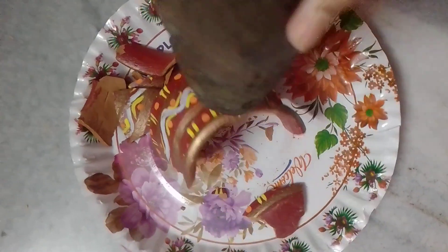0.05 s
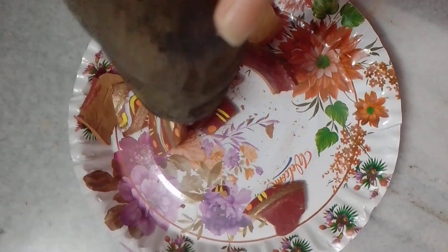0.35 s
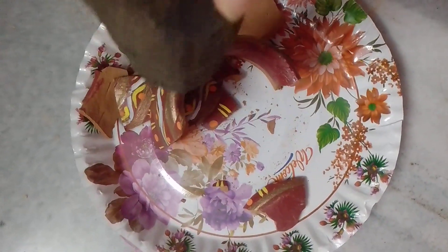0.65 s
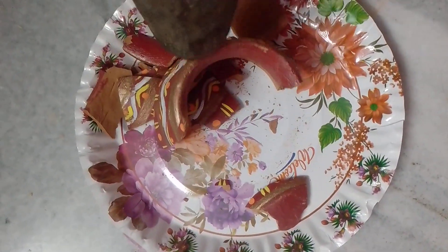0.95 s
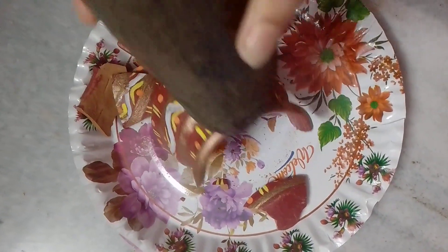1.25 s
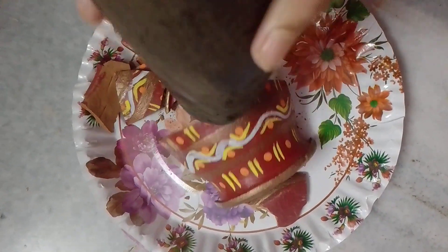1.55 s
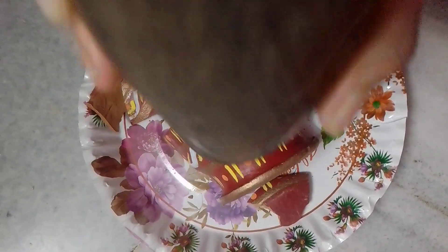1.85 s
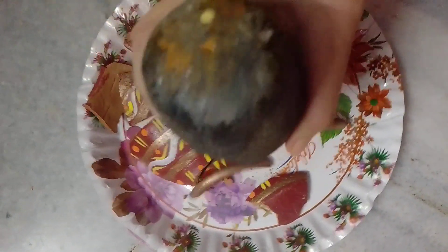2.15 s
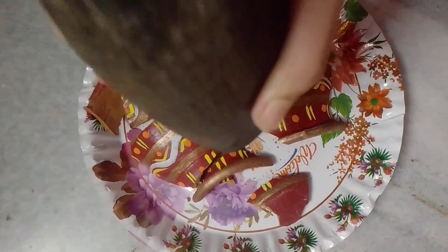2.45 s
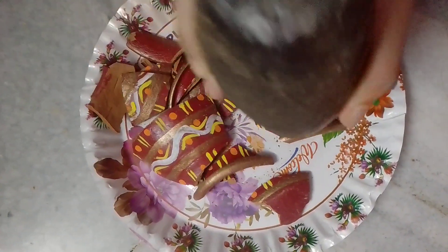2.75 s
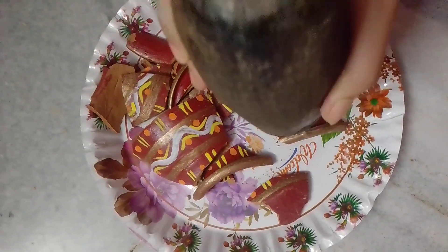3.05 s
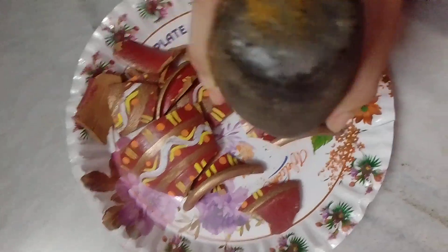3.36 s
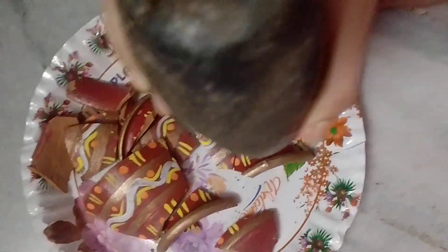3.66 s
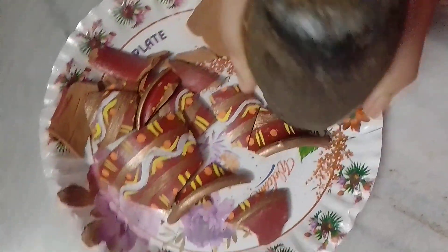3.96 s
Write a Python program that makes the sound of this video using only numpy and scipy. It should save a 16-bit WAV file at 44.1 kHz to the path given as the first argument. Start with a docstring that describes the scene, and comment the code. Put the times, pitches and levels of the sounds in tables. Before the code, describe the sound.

Clay cracks and crunches under repeated stone blows, loose shards clinking on a plate indoors.

```python
"""Pestle crushing a clay pot

One microphone, close to a plate in a hard-walled room, where a stone pestle crushes a small pot's pieces.
Each blow rings the clay, cracks it and thuds the plate; the break crumbles to grit and loose shards clink.
The recorder's limiter ducks at each heavy blow, so the room swells back just after it."""
import sys
import numpy as np
from scipy import signal
from scipy.fft import rfft, irfft
from scipy.io import wavfile
from scipy.ndimage import uniform_filter1d, minimum_filter1d

SR = 44100
rng = np.random.default_rng(int(sys.argv[2]) if len(sys.argv) > 2 else 0)


def unload_audio(sound):
    """Save the sound as a 16-bit wav file, at the path given as the first command line argument."""
    columns = np.transpose(np.atleast_2d(sound))
    # keep every value between -1 and 1, then stretch to whole-number steps
    steps = np.round(np.clip(columns, -1, 1) * 32767)
    wavfile.write(sys.argv[1], SR, steps.astype(np.int16))


N = 176400

CRACK_T60_S, CONTACT_S = 0.021, 0.00028
CLAY_DAMPING = 0.56  # ring time falls as this power of the pitch ratio
# modes of a piece of clay: pitch_ratio, level_db
CLAY_RESONANCES = [(0.579, -19.5), (0.751, -6.5), (0.832, -15.5), (.92, -5.5), (1, 0), (1.1, -0.5),
                   (1.2, -4.5), (1.368, -11.5), (1.551, -5), (1.76, -10), (2.05, -22.5), (2.448, -25.5)]
# stone and shards striking, close to the microphone; crack and thud are offsets from the level:
# start_s, level_db, pitch_hz, t60_s, crack_db, thud_db
BLOWS = [(.005, -25, 1614, 0.036, 11.5, 2), (.040, -19.5, 1543, 0.025, 3, -20),
         (.067, -21.5, 2750, 0.029, -4, -16), (.126, -35, 3350, .015, 10, -3),
         (0.146, -34, 1545, 0.062, 7.5, -22), (0.175, -42, 3000, .01, 14, -14),
         (0.226, -34, 2880, 0.038, -11, -29), (0.2641, -32.5, 2950, 0.029, 4, -21),
         (0.298, -39, 2726, 0.11, 3, 8), (0.356, -21, 2680, 0.0076, -5.5, -28),
         (0.45, -46.5, 1574, 0.049, -21, -10), (.550, -57, 1626, 0.087, -14, -13),
         (1.01, -29, 1980, 0.036, 8, 16), (1.152, -46.5, 2870, .025, 4, 9),
         (1.165, -40.5, 3020, 0.016, 7, 10), (1.2271, -20, 2800, 0.0082, -8, -14.5),
         (1.261, -25, 2720, 0.005, -8, -9.5), (1.498, -25, 2940, 0.0073, 0.5, -12),
         (1.5021, -1.5, 1500, 0.0088, -17.5, -9.5), (1.504, -2.5, 2174, 0.0062, -10.5, -12),
         (1.723, -43, 2560, 0.026, 4.5, 14.5), (2.1046, 3, 1663, 0.012, -6, -15.5),
         (2.120, 2, 1884, 0.03, -3, -25), (2.136, -13, 1700, 0.054, -15, -15),
         (2.158, -16, 1760, .04, 8, -28), (2.1669, -2, 1730, .045, -6, -22.5),
         (2.2342, -11, 2400, .015, -1.5, -27), (2.291, -37, 2400, .03, -3.5, -17),
         (2.299, -24, 2360, 0.018, 0, -20), (2.337, -34.5, 3502, 0.0085, 2, -31),
         (2.379, -40.5, 3370, 0.012, 7.5, -17), (2.473, -41.5, 2400, 0.066, 6, -21),
         (2.8865, 3.5, 2195, 0.015, -11, -19), (2.8865, -4.5, 1642, 0.042, -17, -19.5),
         (2.898, -6.5, 1847, 0.026, -11.5, -11.5), (3.3455, 5, 2254, .012, -2.5, -19.5),
         (3.3518, 2, 2320, 0.012, -31, -33), (3.359, -6.5, 2700, 0.018, 8.5, -3),
         (3.3858, -9.5, 3236, 0.024, -2, 0), (3.4046, -13, 2984, .04, 1, 0.5),
         (3.9277, -4, 2600, 0.015, -2, -4), (3.939, 5.5, 2490, 0.015, 5.5, -4),
         (3.9538, -5.5, 1734, 0.025, -4, -28)]
def knocks():
    """Every contact rings a piece of clay, spits a crack and thuds the plate."""
    out, t, fracture = np.zeros(N), clock(.2), fracture_noise()
    contact = 1 - np.exp(-t / CONTACT_S)
    for at, db, hz, t60, crack_db, thud_db in BLOWS:
        detunes = 1 + 0.021 * rng.standard_normal(len(CLAY_RESONANCES))
        phases = 2 * np.pi * rng.random(len(CLAY_RESONANCES))
        clay = sum(ring(t, hz * ratio * detune, mode_db, t60 / ratio ** CLAY_DAMPING, phase)
                   for (ratio, mode_db), detune, phase in zip(CLAY_RESONANCES, detunes, phases))
        crack = np.roll(fracture, -int(at * SR))[:len(t)] * fade(t, CRACK_T60_S) / 2
        add(out, at, undb(db) * contact * (clay + undb(crack_db) * crack + undb(thud_db) * plate(t)))
    return out


# colour of breaking clay at close range: frequency_hz, relative_db
FRACTURE_SPECTRUM = [(40, -39), (300, 4), (900, 14), (1800, -1.5), (3500, 12), (5500, 3), (7500, -3.5),
                     (10000, -7), (12500, -32.5), (16000, -19.5)]
def fracture_noise():
    """The noise of clay breaking, from which cracks and grit are cut."""
    return noise(FRACTURE_SPECTRUM)


# modes of the plate on its table: pitch_hz, level_db, t60_s
PLATE_RESONANCES = [(252, -19, 0.055), (350.6, -10.5, 0.051), (433, -17, 0.031), (521, -15, 0.039),
                    (675, -13.5, 0.036), (790, -15, 0.014), (1000, -13.5, 0.013), (1391, -11, 0.029)]
def plate(t, detune=.04):
    """The plate's short dull ring; each touch shifts its modes a little."""
    return sum(ring(t, hz * (1 + detune * rng.standard_normal()), db, t60)
               for hz, db, t60 in PLATE_RESONANCES)


GRAINS_PER_S, GRAIN_SCATTER_DB, GRAIN_T60_CYCLES, CRUMBLE_FADE_DB = 1100, 5, 45, 11.5
# clay crumbling under the pestle; grit and rumble are offsets from the level:
# start_s, length_s, level_db, pitch_hz, spread_octaves, grit_db, rumble_db
CRUMBLE_RUNS = [(.005, 0.032, -31, 2325, 0.5, -0.5, -18.5), (0.069, .06, -37.5, 2240, 0.46, -15, -20),
                (0.129, 0.26, -45.5, 2087, 0.41, -10.5, -22), (0.748, 0.13, -60, 1776, 0.066, -33, -22),
                (1.008, 0.037, -33.5, 2506, 0.39, -17, -2), (1.13, 0.056, -58, 3200, 0.29, 0, -13),
                (1.504, .025, -39.5, 2350, 0.33, -2.5, -14), (1.532, 0.067, -45, 2470, 0.45, -8.5, -1),
                (2.105, 0.061, -16.5, 1935, 0.26, -6, -25), (2.164, 0.037, -12, 3396, .65, -5.5, -40.5),
                (2.192, 0.047, -33, 2020, 0.37, -15.5, -15.5), (2.292, 0.088, -47.5, 2700, 0.36, -8.5, -23),
                (2.555, .07, -58.5, 1930, .25, -10.5, 1), (2.89, .008, -9.5, 3698, .4, -9.5, -16),
                (3.345, 0.063, -20.5, 2890, 0.38, -15.5, -27), (3.403, 0.036, -21.5, 3145, .3, -10, -8.5),
                (3.441, 0.06, -42.5, 3070, 0.26, -9, -4), (3.926, .085, -19, 2990, 0.52, -5.5, -7)]
def crumbles():
    """Runs of tiny fractures: each pings a crumb, spits grit and shakes the plate."""
    out, t, fracture = np.zeros(N), clock(.02), fracture_noise()
    thud, span = plate(clock(0.18)), SR // 2
    for at, length, db, hz, octaves, grit_db, rumble_db in CRUMBLE_RUNS:
        draws = rng.random((400, 3))
        pitches = hz * 2 ** (octaves * np.sqrt(3) * rng.uniform(-1, 1, len(draws)))
        count = int(GRAINS_PER_S * length) + 1
        pings, pushes = np.zeros((2, span))
        for (progress, size, sign), grain_hz in zip(draws[:count], pitches):
            grain_db = -GRAIN_SCATTER_DB * np.log(max(size, .02)) - CRUMBLE_FADE_DB * progress
            gain = undb(grain_db) * np.sign(sign - .5)
            add(pings, progress * length, gain * ring(t, grain_hz, 0, GRAIN_T60_CYCLES / grain_hz))
            add(pushes, progress * length, np.array([gain]))
        bursts = signal.fftconvolve(pushes, fade(t, t60=0.0033))[:span]
        grit = bursts * np.roll(fracture, -int(at * SR))[:span]
        rumble = signal.fftconvolve(pushes, thud)[:span]
        run = unit(pings) + undb(grit_db) * unit(grit) + undb(rumble_db) * unit(rumble)
        add(out, at, undb(db) * np.sqrt(length * SR / span) * run)
    return out


OVERTONE_RATIO, OVERTONE_DB = 1.92, -26
# free shards ringing near the microphone: start_s, pitch_hz, level_db, t60_s, width_hz
SHARDS = [(.005, 5365, -17.5, 0.036, 40), (0.041, 5810, -30, 0.047, 50), (0.148, 5830, -33.5, 0.055, 50),
          (.147, 1590, -33, 0.088, 28), (0.224, 1583, -30.5, .08, 25), (.40, 1580, -41, 0.13, 40),
          (0.246, 5900, -46, .06, 46), (0.295, 5860, -49, 0.12, 63), (.355, 4342, -24.5, 0.083, 7.3),
          (.452, 1570, -46, 0.3, 6.9), (0.549, 1580, -49.5, 0.18, 4.1), (1.066, 5800, -49, 0.16, 80),
          (1.094, 5810, -52, 0.17, 90), (1.154, 5820, -46.5, 0.064, 60), (1.2284, 4350, -21, 0.1, 3.3),
          (1.228, 8317, -40, .05, 79), (1.319, 5800, -52, 0.14, 60), (1.505, 3110, -16.5, 0.031, 22),
          (2.176, 2263, 0.5, 0.095, 6.4), (2.199, 1605, -14.5, 0.13, 16), (2.2364, 2387, 8, 0.019, 25),
          (2.886, 2604, -3, 0.05, 29), (3.384, 10830, -28, 0.13, 320)]
def clinks():
    """Loose shards ring with one tone and a weak overtone, both widened by chattering on the plate."""
    out, t = np.zeros(N), clock(0.82)
    for at, hz, db, t60, width_hz in SHARDS:
        chatter = wander(len(t), width_hz)
        add(out, at, ring(t, hz, db, t60, uniform_filter1d(chatter, size=40)))
        add(out, at, ring(t, hz * OVERTONE_RATIO, db + OVERTONE_DB, t60, 2 * chatter))
    return out


# partials of a thin ring behind the clinks: pitch_hz, level_db
CHIME_PARTIALS = [(3030, -57), (3772, -60), (4271, -64), (5030, -70), (7730, -83), (8900, -86.5)]
def chime(start_s=2.473, t60_s=1, width_hz=8):
    """One knock leaves a faint, lingering metallic ring."""
    out, t = np.zeros(N), clock(0.82)
    add(out, start_s, sum(ring(t, hz, db, t60_s, wander(len(t), width_hz)) for hz, db in CHIME_PARTIALS))
    return out


EARLY_DB, EARLY_T60_S, EARLY_ONSET_S, TAIL_ONSET_S = -10.5, 0.15, 0.00098, .002
# the hard walls' reverberation, heard from beside the plate: centre_hz, t60_s, level_db
ROOM_BANDS = [(100, .4, -14), (330, 0.91, -14.5), (800, 0.62, -24), (1600, 0.36, -8), (2893, 0.39, -11),
              (5930, 0.38, -9), (9700, .32, -9), (16000, .25, -13.5)]
def room(direct):
    """Quick reflections off plate, hand and floor, then a diffuse tail that dies sooner in the treble."""
    t = clock(.8)
    log_hz = np.log(np.maximum(np.fft.rfftfreq(len(t), 1 / SR), 1))
    centres = np.log([hz for hz, _, _ in ROOM_BANDS])
    spectrum = rfft(rng.standard_normal(len(t)))
    decay = lambda t60: unit(fade(t, t60)) / np.sqrt(len(t))
    tail = sum(irfft(spectrum * np.interp(log_hz, centres, band), len(t)) * decay(t60) * undb(db)
               for (_, t60, db), band in zip(ROOM_BANDS, np.eye(len(ROOM_BANDS))))
    tail *= 1 - np.exp(-t / TAIL_ONSET_S)
    early = undb(EARLY_DB) * rng.standard_normal(len(t)) * decay(EARLY_T60_S)
    early *= 1 - np.exp(-t / EARLY_ONSET_S)
    return direct + signal.fftconvolve(direct, early + tail)[:N]


# low tones in the room: pitch_hz, level_db
HUM_TONES = [(74.5, -68), (100, -76), (225, -67), (285, -68)]
def hum():
    """A low, wavering hum."""
    t = np.arange(N) / SR
    return sum(undb(db) * np.sin(2 * np.pi * hz * t + wander(N, width_hz=3)) for hz, db in HUM_TONES)


# room tone at the microphone: frequency_hz, relative_db
AIR_SPECTRUM = [(18, -82), (30, -22), (59, -13), (106, 3.5), (124, -4), (174, -22), (210, -12.5), (280, 0),
                (364, -1), (449, -8), (569, 2), (721, -11), (1460, -11.5), (1590, -3.5), (1960, -12.5),
                (2230, -9.5), (16000, -52)]
def room_air(level_db=-58):
    """Quiet, steady air behind everything."""
    return undb(level_db) * noise(AIR_SPECTRUM)


def undb(db):
    """Decibels to gain."""
    return 10 ** (np.asarray(db) / 20)


def unit(x):
    """Scale to rms 1."""
    return x / np.sqrt(np.mean(x ** 2) + 1e-18)


def clock(length):
    """Sample times from 0 to length seconds."""
    return np.arange(int(length * SR)) / SR


def fade(t, t60):
    """Exponential decay, 60 dB in t60."""
    return np.exp(-np.log(1000) * t / max(t60, 1e-4))


def ring(t, hz, db, t60, phase=0):
    """One struck mode."""
    return undb(db) * fade(t, t60) * np.sin(2 * np.pi * min(hz, SR / 2) * t + phase)


def wander(count, width_hz):
    """Drifting phase that widens a tone into a line of the given width."""
    return np.cumsum(rng.standard_normal(count)) * np.sqrt(2 * np.pi * abs(width_hz) / SR)


def noise(points):
    """Noise of rms 1 coloured by (Hz, dB) points."""
    hz, db = np.array(points).T
    bins_hz = np.maximum(np.fft.rfftfreq(N, 1 / SR), 1)
    colour = undb(np.interp(np.log(bins_hz), np.log(hz), db))
    return unit(irfft(rfft(rng.standard_normal(N)) * colour, N))


def add(out, at, x):
    """Mix x into out from a given time."""
    i = max(int(at * SR), 0)
    out[i:i + len(x)] += x[:max(len(out) - i, 0)]


def scene():
    """Blows, crumbs and shards up close, the room around them, in mono."""
    bass_cut = signal.butter(4, 286, "highpass", fs=SR, output="sos")  # small objects radiate little bass
    direct = signal.sosfilt(bass_cut, knocks() + crumbles() + clinks() + chime())
    return (room(direct) + hum() + room_air())[None]


CEILING, RELEASE_DB_PER_S, LOOKAHEAD_S, TOP_HZ = 0.71, 125, .001, 16300
def record(dry):
    """A look-ahead limiter holds the peaks and recovers steadily; large swings bend; the top is cut."""
    window = int(LOOKAHEAD_S * SR)
    over_db = 20 * np.log10(np.maximum(np.abs(dry[0]) / CEILING, 1))
    release_db = RELEASE_DB_PER_S * np.arange(N) / SR
    duck_db = release_db - np.maximum.accumulate(over_db + release_db)
    held = dry * uniform_filter1d(minimum_filter1d(undb(duck_db), window), window)
    bent = held + 0.1 * held ** 2  # the recorder's lopsided response
    return signal.sosfilt(signal.ellip(8, .2, 70, TOP_HZ, fs=SR, output="sos"), bent)


dry = scene()
out = record(dry)
unload_audio(out)
```